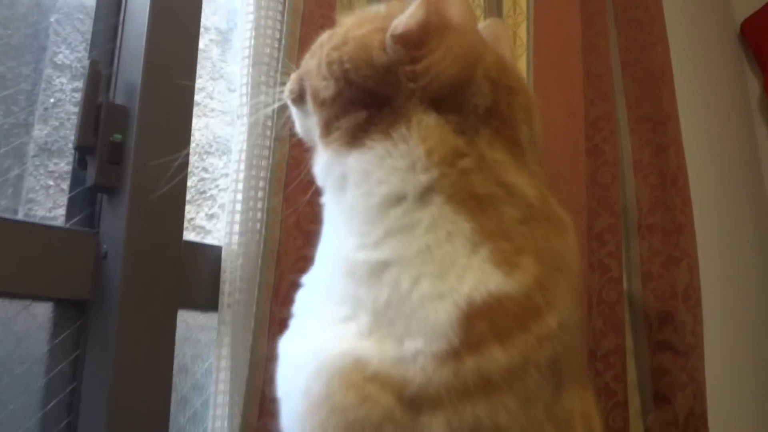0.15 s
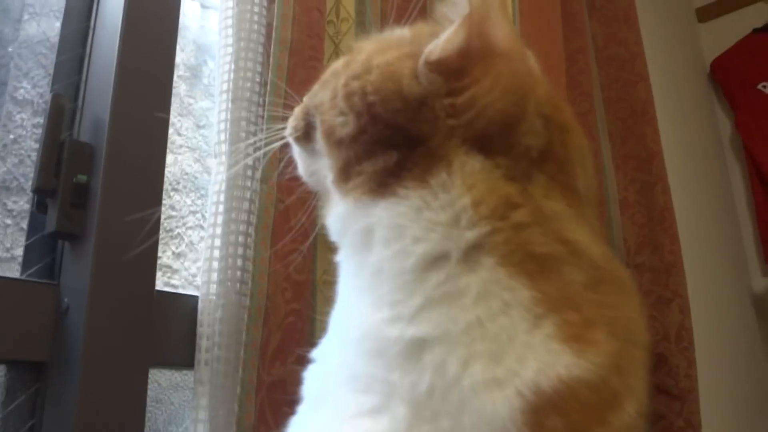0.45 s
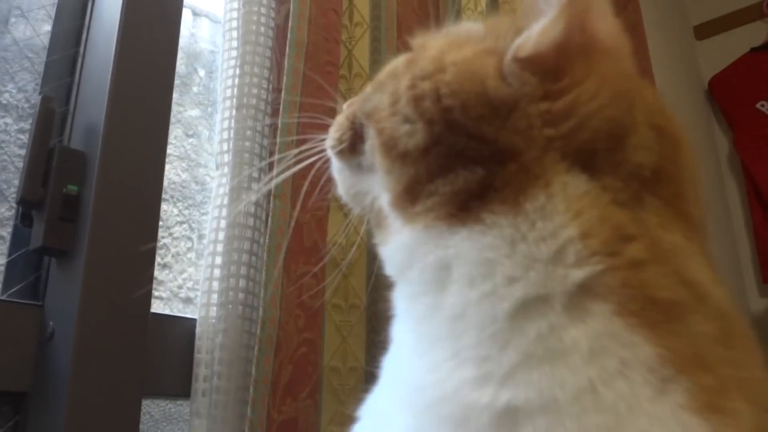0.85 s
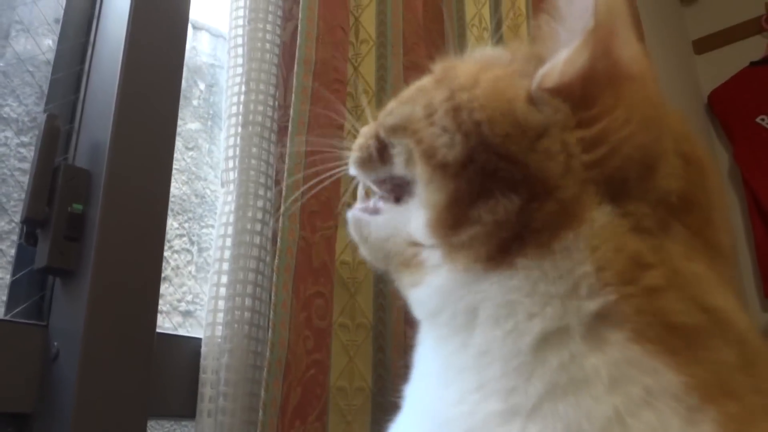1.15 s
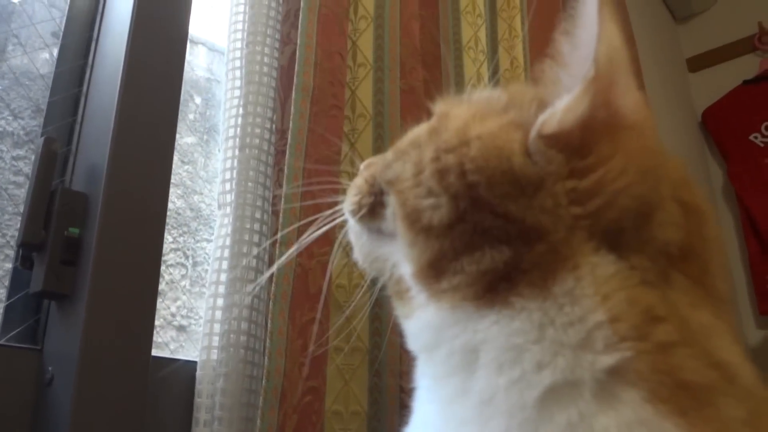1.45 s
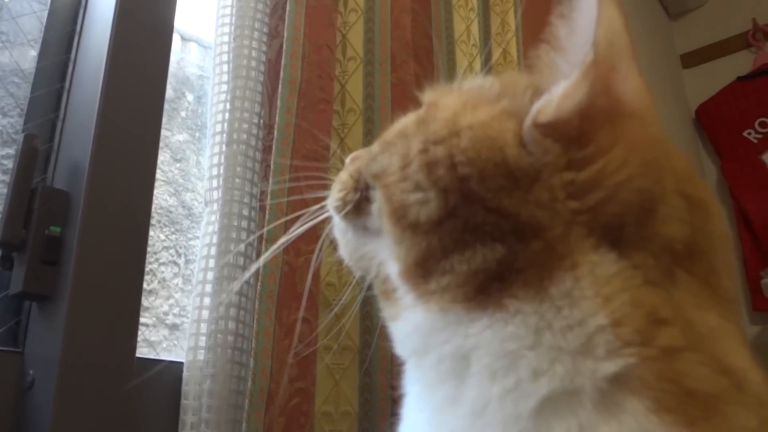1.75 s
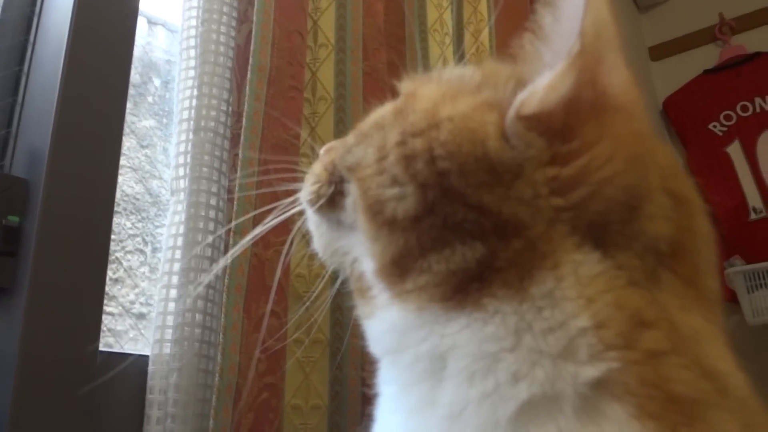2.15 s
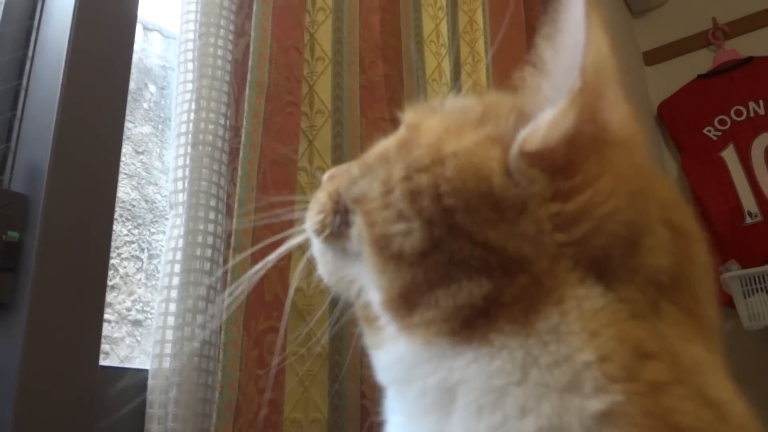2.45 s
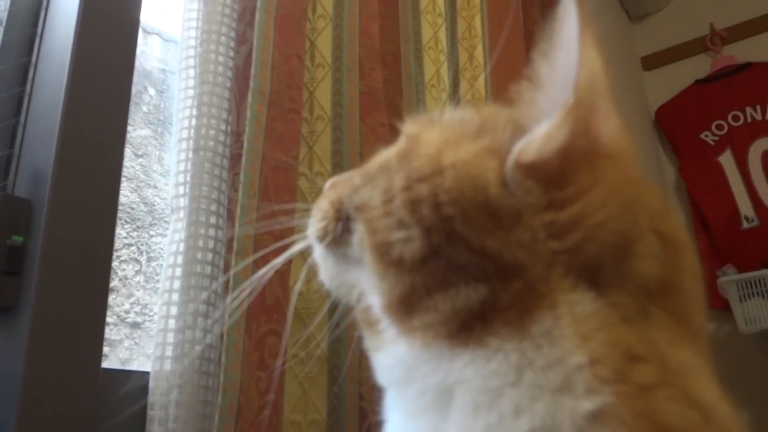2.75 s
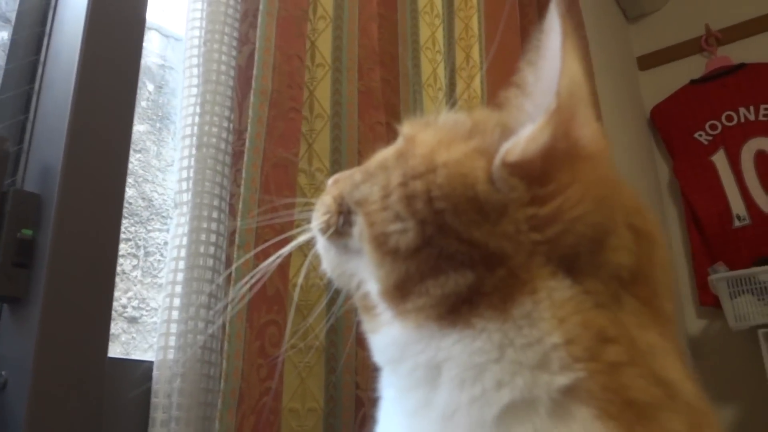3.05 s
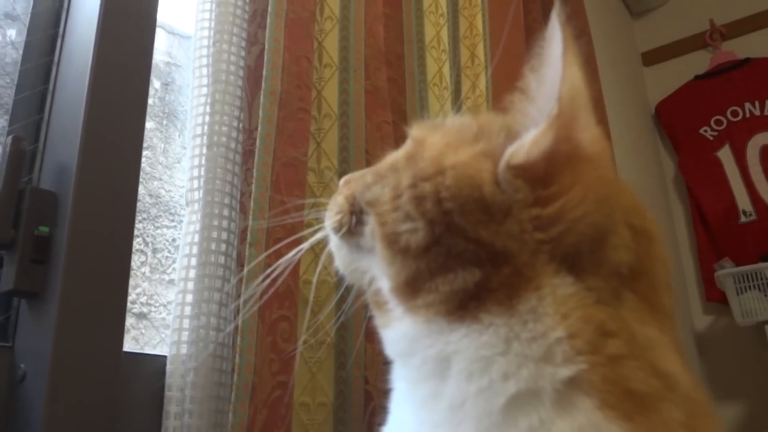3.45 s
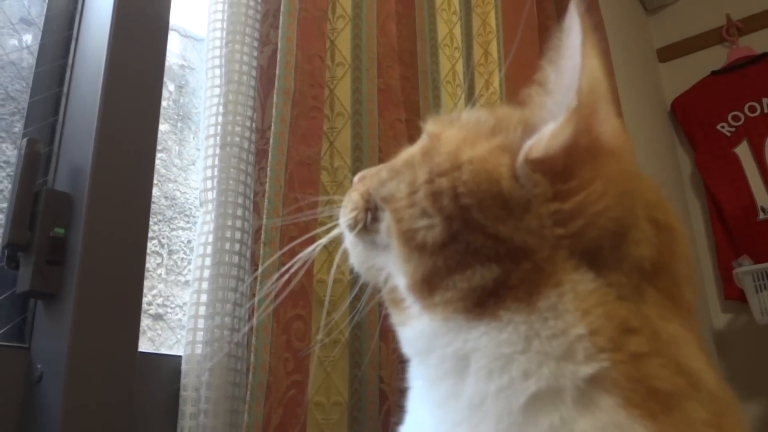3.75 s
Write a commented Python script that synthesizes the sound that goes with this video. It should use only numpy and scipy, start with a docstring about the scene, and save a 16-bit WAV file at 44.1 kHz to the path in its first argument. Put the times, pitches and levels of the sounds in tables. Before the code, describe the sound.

A cat gives one short raspy chirp indoors, followed by two dull wooden knocks.

```python
"""Low rumble, faint outdoor noise and microphone hiss fill a small quiet room throughout.
First a hand-held camera ticks, a sleeve rustles, and a faint knock and a soft bump sound nearby.
At 1.16 s a cat at the window gives one short falling chirp: its vocal folds beat unevenly, its jaw
clicks and the note breaks into a rasp. Two louder, dull knocks then set something wooden ringing,
among more dry ticks of the camera's case, and a deep bump comes near the end."""
import sys
import numpy as np
from scipy import signal
from scipy.fft import rfft, irfft
from scipy.io import wavfile

SR = 44100
rng = np.random.default_rng(int(sys.argv[2]) if len(sys.argv) > 2 else 0)


def store_pcm(level_fs):
    """Save levels as 16-bit WAV."""
    pcm = np.round(np.clip(level_fs, -1, 1) * 32767).astype(np.int16)
    wavfile.write(sys.argv[1], SR, np.atleast_2d(pcm).T)


N = 171549
TIME = np.arange(N) / SR
BIN_HZ = np.arange(N // 2 + 1) * SR / N


def from_db(db):
    """Amplitude grows tenfold for every 20 dB."""
    return 10 ** (np.asarray(db) / 20)


def rms_one(x):
    """Dividing by the root mean square gives unit power."""
    return x / np.sqrt(np.mean(x ** 2) + 1e-20)


def in_time(rows, outside=None):
    """Linear interpolation gives a curve's value at every sample."""
    return np.interp(TIME, *np.transpose(rows), left=outside, right=outside)


def at_hz(rows, hz, column=1):
    """A spectrum is interpolated on a logarithmic frequency axis."""
    rows = np.array(rows)
    return np.interp(np.log(hz + 1e-6), np.log(rows[:, 0]), rows[:, column])


def low_pass(x, hz):
    """A second-order filter takes 12 dB an octave off the treble."""
    return signal.sosfilt(signal.butter(2, hz, fs=SR, output="sos"), x + 1e-18)


def high_pass(x, hz):
    """A second-order filter takes 12 dB an octave off the bass."""
    return signal.sosfilt(signal.butter(2, hz, "high", fs=SR, output="sos"), x + 1e-18)


def noise(spectrum):
    """Spectral shaping turns white noise into coloured noise of unit power."""
    white = rfft(rng.standard_normal(N))
    return rms_one(irfft(white * from_db(at_hz(spectrum, BIN_HZ)) * (BIN_HZ > 10), N))


def ring(start, hz, t60):
    """A damped mode, once struck, falls by 60 dB in t60 seconds."""
    age = np.maximum(TIME - start, 0)
    return np.sin(2 * np.pi * hz * age) * np.exp(-np.minimum(np.log(1000) * age / t60, 20))


def place(x, pan_db, lag_s):
    """Level and time differences give direction: the left port hears the sound later by the lag."""
    return np.array([np.interp(TIME - lag_s, TIME, x) * from_db(pan_db), x * from_db(-pan_db)])


def room(x, side_db):
    """Reverberation: dense reflections decay exponentially and differ between the channels."""
    t60, gap_s, build_s = 0.29, 0.0021, 0.00098
    t = TIME[:SR // 2]
    envelope = from_db(-60 * t / t60) * np.clip((t - gap_s) / build_s, 0, 1)
    mid, side = rng.standard_normal((2, len(t))) * envelope / np.sqrt(2 * np.sum(envelope ** 2))
    side = side * from_db(side_db)
    response = low_pass(np.array([mid + side, mid - side]), hz=8000)
    return signal.fftconvolve(x[None], response, axes=1)[:, :N]


def background():
    """Rumble, outdoor noise and hiss are stationary noise; an independent side signal gives width."""
    # The noise's colour. Each row: frequency in Hz, relative spectral density in dB.
    air = [(20, -11), (30, -12), (39, -0.5), (52, -7.5), (76, 3), (92, 2), (115, -10.5), (150, -4.5),
           (180, -11.5), (250, -14), (330, -18.5), (620, -21), (860, -17.5), (1250, -26.5), (1800, -30),
           (2500, -30.5), (4500, -35), (9000, -38), (12000, -39.5), (15500, -44)]
    # Its width, greatest in the middle range. Each row: frequency in Hz, side minus mid in dB.
    width = [(60, -22), (110, -12.5), (200, -4.5), (380, 3.5), (700, 3.5), (1290, 5), (2380, 1.5),
             (4400, -2), (8120, -7), (15000, -19)]
    # Its lean to the right. Each row: frequency in Hz, left minus right in dB.
    lean = [(60, -0.5), (700, -0.6), (1300, -2), (4400, -1.4), (15000, -.1)]
    mid = rfft(noise(air))
    side = rfft(noise(air)) * from_db(at_hz(width, BIN_HZ))
    tilt = from_db(at_hz(lean, BIN_HZ) / 2)
    return from_db(-52) * np.array([irfft((mid + side) * tilt, N), irfft((mid - side) / tilt, N)])


def rustle():
    """Friction of a sleeve near the microphone makes faint noise, uncorrelated between the channels."""
    # The rustle's envelope. Each row: time in seconds, level in dB.
    levels = [(0, -67), (.055, -67), (.067, -53), (.08, -66), (.3, -68), (.42, -64), (.55, -73)]
    # The cloth's colour. Each row: frequency in Hz, relative spectral density in dB.
    colour = [(100, -6), (280, 5), (600, -6), (1100, 2), (2000, -5), (3400, -3.5), (5000, -13),
              (15000, -25)]
    return from_db(in_time(levels, -np.inf)) * np.array([noise(colour), noise(colour)])


def bumps():
    """A low tone under a Gaussian envelope has no sharp onset, like a footfall through the floor."""
    # Each row: centre in seconds, envelope peak in dB, frequency in Hz, half-width in seconds.
    swells = [(0.414, -49, 216, 0.007), (3.587, -40.5, 84, 0.016)]
    out = 0
    for centre, db, hz, width_s in swells:
        t = TIME - centre
        out = out + from_db(db) * np.exp(-.5 * (t / width_s) ** 2) * np.sin(2 * np.pi * hz * t)
    return out


def ticks():
    """Two heavily damped modes of the camera's case ring right at the microphone, so they sound dry."""
    # Each row: start in seconds, strength in dB, frequency of the lower mode in Hz.
    taps = [(0.015, -37.5, 2400), (1.4828, -25, 2410), (2.1835, -30.5, 2480), (3.5602, -41.5, 3300),
            (3.835, -34.5, 2580)]
    t60, rise_s, overtone_ratio = 0.0074, 0.00037, 1.45
    out = 0
    for start, db, hz in taps:
        case = ring(start, hz, t60) + from_db(-8) * ring(start, hz * overtone_ratio, t60)
        attack = 1 - np.exp(-np.maximum(TIME - start, 0) / rise_s)
        out = out + from_db(db) * case * attack
    return place(high_pass(out, hz=1700), pan_db=0.8, lag_s=.0001)


def knocks():
    """An impact cracks and excites the wood's normal modes; a softer contact passes less treble."""
    # Each row: start in seconds, strength in dB, contact cutoff in Hz, relative gain of the crack in dB.
    blows = [(0.1526, -54, 1530, 5), (1.866, -30.5, 2500, 1), (2.9500, -34, 1300, 2.5)]
    # The wood's modes. Each row: frequency in Hz, relative level in dB, 60 dB decay time in seconds.
    wood = [(127.7, -1, 0.15), (151, -8, 0.22), (228, -16, 0.4), (279.4, -4, 0.14), (338, -14.5, 0.23),
            (460.6, -7, 0.16), (553, -8, 0.11), (621, -8, 0.1), (703, -25, .15), (846.4, -7.5, 0.11),
            (1088, -18, 0.1), (1570, -17, 0.075), (1700, -15, 0.099), (2240, -26, .09), (2440, -14, 0.068)]
    # The brief modes of first contact, with the same columns.
    contact_modes = [(690, 10, 0.0052), (1210, 5.5, 0.0049), (2440, -2, 0.0062)]
    # The wood's dense, quick ringing. Each row: frequency in Hz, relative spectral density in dB.
    clatter_colour = [(100, -7), (380, 1.5), (850, 0), (1200, -25), (1600, -8.5), (2500, -11.5),
                      (3700, -12.5), (4300, -16), (5000, -35), (9000, -34)]
    clatter_db, clatter_t60 = -4, .08
    body, cracks = 0, 0
    for start, db, cutoff_hz, crack_db in blows:
        modes = sum(from_db(mode_db) * ring(start, hz, t60) for hz, mode_db, t60 in wood)
        contact = sum(from_db(mode_db) * ring(start, hz, t60) for hz, mode_db, t60 in contact_modes)
        fade = (TIME > start) * np.exp(-np.log(1000) * np.clip(TIME - start, 0, 1) / clatter_t60)
        crack = from_db(clatter_db) * fade * noise(clatter_colour) - contact
        body = body + from_db(db) * low_pass(modes, cutoff_hz)
        cracks = cracks + from_db(db + crack_db) * low_pass(crack, cutoff_hz)
    direct = place(body + cracks, pan_db=-1, lag_s=.0001)
    return high_pass(direct + from_db(-3.5) * room(cracks, side_db=-1), hz=68)


def voice():
    """A harmonic series falls in pitch and brightens; uneven beating of the folds modulates it."""
    # The falling fundamental. Each row: time in seconds, frequency in Hz.
    melody = [(1.159, 898.5), (1.165, 881), (1.170, 842), (1.175, 776.5), (1.186, 778.6), (1.196, 775),
              (1.206, 740), (1.235, 725)]
    # Vocal effort. Each row: time in seconds, level in dB.
    effort = [(1.159, -57), (1.163, -39), (1.172, -40.5), (1.183, -36), (1.188, -51), (1.193, -45.5),
              (1.199, -38.5), (1.204, -72), (1.22, -68), (1.24, -63)]
    # The chirp's early and later tone colours: the fundamental fades as the upper harmonics brighten. # Each
    # row: frequency in Hz, early gain in dB (weighted by 1.5 minus the change below), later gain in dB
    # (weighted by the change).
    colours = [(800, -1.5, -14.5), (1610, -7.5, -1.5), (2280, -12.5, 0), (3200, -14.5, -2.5),
               (3900, -16, -18), (4500, -22, -25), (5530, -20, -9), (6400, -36, -26), (9000, -50, -37)]
    # The change between them. Each row: time in seconds, weight of the later colour from 0 to 1.
    brightening = [(1.165, 0.1), (1.175, 0.86)]
    rough_from_s, rough_rise_s = 1.168, 0.057
    flutter_hz, flutter_depth, flutter_bend = 242, .3, .05  # depth: share of level; bend: of pitch
    roughness = np.clip((TIME - rough_from_s) / rough_rise_s, 0, 1)
    jitter = (0.0038 + 0.025 * roughness) * rms_one(low_pass(rng.standard_normal(N), hz=250))
    flutter = np.sqrt(roughness) * np.sin(2 * np.pi * flutter_hz * (TIME - rough_from_s))
    pitch, blend = in_time(melody), in_time(brightening)
    phase = 2 * np.pi * np.cumsum(pitch * (1 + jitter + flutter_bend * flutter)) / SR
    tone, power = 0, 0
    for k in range(1, 12):
        early_db, later_db = at_hz(colours, k * pitch), at_hz(colours, k * pitch, column=2)
        gain = from_db((1.5 - blend) * early_db + blend * later_db)
        tone = tone + gain * np.sin(k * phase + 2 * np.pi * rng.random())
        power = power + gain ** 2 / 2
    return tone / np.sqrt(power) * from_db(in_time(effort, -np.inf)) * (1 + flutter_depth * flutter)


def cat():
    """Voice, rasp and jaw click arrive directly, then by reflection from the pane and the room."""
    # The rasp as the voice breaks up. Each row: time in seconds, level in dB.
    rasp_levels = [(1.16, -59), (1.177, -48), (1.188, -47), (1.196, -42.5), (1.206, -46.5), (1.218, -49),
                   (1.232, -53.5), (1.25, -67)]
    # Its colour. Each row: frequency in Hz, relative spectral density in dB.
    rasp_colour = [(300, -40), (520, -24), (730, 9.5), (1200, -3), (2150, -1.5), (2800, -5), (3500, 3.5),
                   (4400, -13.5), (6800, -14), (8500, -23), (15000, -32)]
    jaw_hz, pane_delay_s = 2150, .0105
    note = voice()
    rasp = noise(rasp_colour) * from_db(in_time(rasp_levels, -np.inf))
    # The derivative of a damped sine starts abruptly, as a click.
    jaw = np.gradient(ring(start=1.1937, hz=jaw_hz, t60=0.0028)) * SR / (2 * np.pi * jaw_hz)
    call = note + rasp + from_db(-22) * jaw
    echo = from_db(-17) * np.interp(TIME - pane_delay_s, TIME, call)
    return place(call + echo, pan_db=0, lag_s=.00005) + from_db(-5) * room(call, side_db=-4)


def scene():
    """Superposition: the pressures of all sources add at the two microphone ports."""
    return cat() + knocks() + ticks() + bumps() + rustle() + background()


def record(dry):
    """Band limiting: a steep elliptic low-pass removes the highest treble."""
    cutoff_hz = 15750
    return signal.sosfilt(signal.ellip(12, .1, 70, cutoff_hz, fs=SR, output="sos"), dry)


dry = scene()
out = record(dry)
store_pcm(out)
```